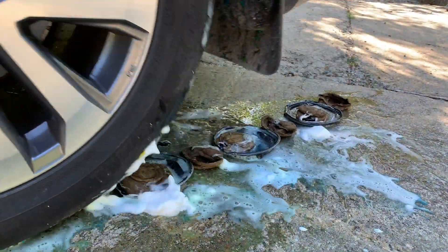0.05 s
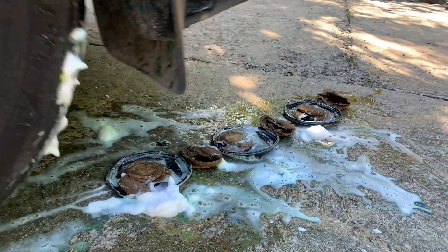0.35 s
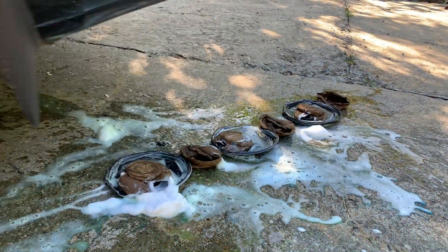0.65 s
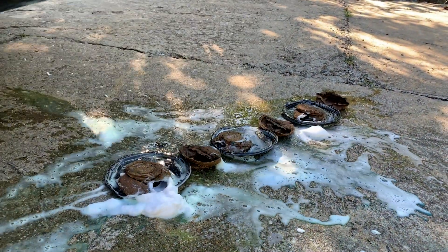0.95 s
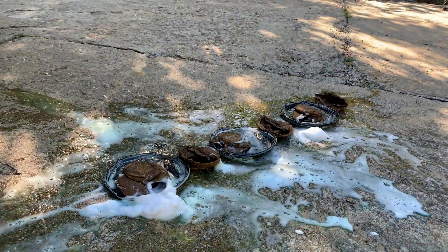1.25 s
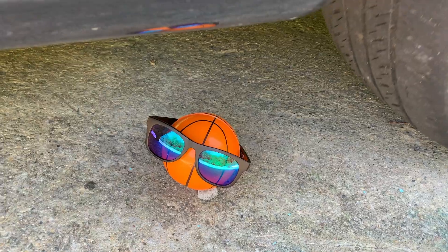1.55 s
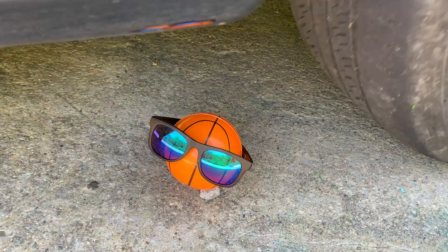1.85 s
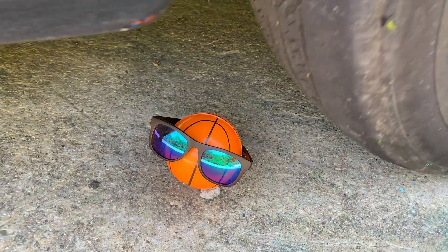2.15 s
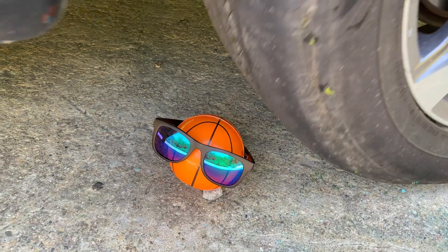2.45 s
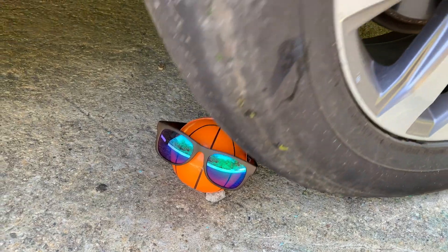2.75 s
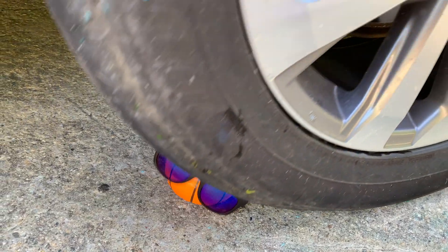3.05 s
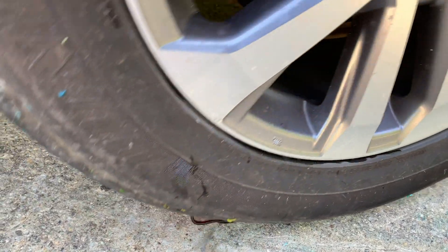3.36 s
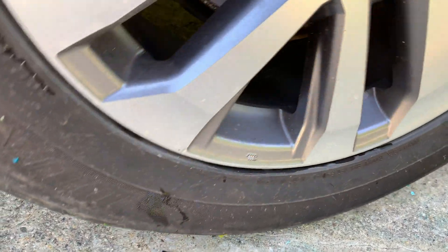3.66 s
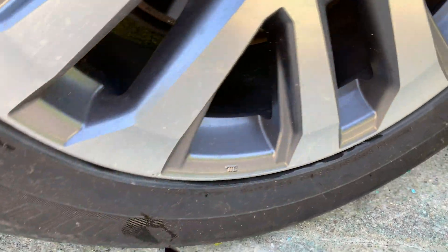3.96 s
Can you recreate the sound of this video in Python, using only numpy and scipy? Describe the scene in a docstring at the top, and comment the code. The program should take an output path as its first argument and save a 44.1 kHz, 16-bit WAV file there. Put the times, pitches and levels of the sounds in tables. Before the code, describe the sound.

Plastic sunglasses and a toy ball crack under a car tyre. The engine first idles quietly, heard close to the ground, then come faint creaks and three loud cracks with ticking splinters near the end.

```python
"""Plastic sunglasses and a toy ball break under a car's tyre: faint cracks, then three loud cracks. Each
fracture releases stored strain as a pop and a burst of noise and sets the frame and tyre ringing; splinters
tick away. The four-cylinder engine idles as the car creeps over concrete, its periodic firing heard as drone
and clatter close to the ground, first by the exhaust, then by the front wheel. The loudest cracks overload the
microphone."""
import sys
import numpy as np
from scipy import signal
from scipy.fft import rfft, irfft
from scipy.io import wavfile
from scipy.ndimage import uniform_filter1d

SR = 44100
rng = np.random.default_rng(int(sys.argv[2]) if len(sys.argv) > 2 else 0)


def to_wav(s):
    """Save 16-bit WAV."""
    ch = np.atleast_2d(s).T  # columns
    pcm = np.round(np.clip(ch, -1, 1) * 32767)  # PCM
    wavfile.write(sys.argv[1], SR, pcm.astype(np.int16))


N = 176400

# Fractures. Each row: start in seconds, pitch in Hz, levels of pop, frame, body, snap and fizz in dB,
# base decay time in seconds, tyre level in dB.
CRACKS = [(3.0752, 400, -38, -47, -38, -30.5, -48, 0.015, -70),
          (3.1037, 887, -58, -63, -51, -44, -59, 0.039, -75),
          (3.3152, 1930, -33, -46, -48, -34, -58, 0.0097, -77),
          (3.3341, 2290, -44, -54, -53, -37, -32.5, 0.023, -77),
          (3.34, 1580, -42, -50, -48, -34.5, -44, 0.0089, -77),
          (3.4320, 683, 0, -15.5, -15.5, -21, -12.5, 0.028, -27.5),
          (3.6720, 1003, -9, -20.5, -20, -15.5, -21.5, 0.026, -30.5),
          (3.6774, 1650, -20, -27, -35, -38, -18.5, 0.023, -65),
          (3.7860, 1400, -19, -26.5, -27.5, -26, -62, 0.03, -55),
          (3.8309, 2780, -24.5, -51, -44, -32.5, -58, 0.01, -62),
          (3.868, 1210, -19.5, -40, -31, -26.5, -41, 0.012, -49),
          (3.8742, 368, -4, -16.5, -18.5, -29.5, -38, 0.031, -27.5),
          (3.8758, 1240, -0.5, -20, -27.5, -19.5, -24, .017, -50),
          (3.9350, 1160, -13, -33.5, -27.5, -28.5, -52, 0.01, -40)]
# Normal modes. Each row: frequency in Hz, relative level in dB, time to decay by 60 dB in seconds.
FRAME_MODES = [(342, -5.5, 0.043), (417, 0.5, 0.033), (460, 0.5, 0.052), (600, 5.5, 0.023),
               (686, 2.5, 0.038), (845, -3, 0.058), (1010, 2, 0.02), (1153, -1, 0.028), (1236, -12, 0.035),
               (1580, -0.5, 0.031), (2020, -4.5, 0.038), (2196, -2, 0.034), (2540, -6, .04)]
TYRE_MODES = [(78, 3, 0.31), (183.5, -2, 0.66), (125, -7.5, 0.5), (155, 0.5, 0.13), (213.5, -1.5, 0.16),
              (293, -5, 0.17), (536, -19.5, 1), (711, -13, 0.59), (767, -15.5, 0.87), (824, -17.5, .7),
              (890, -20, 0.52)]
# Low, middle and high fracture noise. Each row: frequency in Hz, relative spectral level in dB.
BODY_SPECTRUM = [(60, -22), (170, -13), (260, 4), (380, 9.5), (750, 7), (1150, 2), (1500, -14), (4000, -50)]
SNAP_SPECTRUM = [(500, 3), (1100, -8.5), (1380, -5), (1620, 7.5), (1850, -4), (2200, 3.5), (2700, -5),
                 (3300, -7.5), (4500, -8.5), (7000, -30), (14000, -56)]
FIZZ_SPECTRUM = [(1500, 9), (3500, 0.5), (6000, -1), (7800, 1), (9000, -4), (10700, 1.5), (12200, -9.5),
                 (14500, -5), (16000, -14)]
# Splinters. Each row: start in seconds, pitch in Hz, ring in dB, decay time in seconds, click in dB.
SPLINTERS = [(1.094, 6800, -66, .02, -60), (1.266, 4700, -55, .025, -64), (2.848, 5000, -52.5, 0.027, -65),
             (2.891, 6460, -48, 0.012, -56), (3.207, 7500, -63, .015, -54), (3.297, 7800, -60, .015, -52),
             (3.484, 6450, -45, 0.023, -39), (3.4945, 5430, -54, .015, -44), (3.5752, 4600, -52, .015, -43),
             (3.5888, 6430, -42, 0.015, -44), (3.648, 7000, -60, .015, -51), (3.7200, 6560, -39, .025, -38),
             (3.7277, 6400, -39, .025, -41), (3.7360, 6500, -54, 0.024, -47),
             (3.756, 4600, -18.5, 0.021, -30.5), (3.8120, 7540, -63, .015, -58),
             (3.8260, 6500, -49, .025, -55), (3.862, 6570, -33.5, 0.026, -40),
             (3.8950, 6300, -50, .015, -52), (3.9078, 6550, -51, .025, -54),
             (3.9215, 6550, -57, 0.023, -62), (3.956, 6550, -48, .025, -53), (3.9650, 6500, -52, .02, -46),
             (3.9864, 4580, -15.5, 0.0047, -34.5), (3.989, 5760, -24, .032, -34)]
# Modes of a splinter. Each row: ratio to its pitch, relative level in dB.
SPLINTER_MODES = [(1, -7), (1.25, -20), (1.39, -22), (1.69, -12), (1.92, -26)]
# Harmonics of the cycle: those of the exhaust pulses, and at three times the cycle rate a line from a rotating
# shaft. Each row: multiple of the cycle rate, level in dB at the rear and at the front.
HARMONICS = [(1, -51.5, -62), (2, -62, -67), (3, -62, -74), (4, -49, -52), (5, -79, -108), (6, -64, -82),
             (7, -75, -86), (8, -52, -59), (9, -77, -74), (10, -75, -85), (11, -78, -87), (12, -55, -66.5),
             (13, -67.5, -71), (14, -70.5, -77), (16, -83, -67), (20, -69.5, -94)]
# Engine noises. Each row: frequency in Hz, relative spectral level in dB.
REAR_SPECTRUM = [(130, -22), (200, -20), (260, -11), (550, -10), (700, -10), (900, -15), (1510, -18),
                 (1800, -17.5), (2000, -24.5), (3060, -27), (3630, -32.5), (7000, -42.5), (10500, -49),
                 (16000, -55)]
FRONT_SPECTRUM = [(100, -39), (170, -15), (312, -2.5), (350, -6), (681, -4), (1430, -12.5), (1730, -11),
                  (2050, -18.5), (3180, -20.5), (4070, -31), (4920, -27.5), (8380, -42.5), (13700, -45.5),
                  (16000, -47)]
RUMBLE_SPECTRUM = [(10, -5), (20, 2.5), (50, 0.5), (90, 0.5), (160, -6), (260, -20.5), (600, -74)]
HISS_SPECTRUM = [(11500, -16), (12400, -13), (12750, -1), (13100, -10), (13550, 2), (13950, -7),
                 (14350, -1), (14900, -7), (15800, -7)]
# Resonances of engine parts. Each row: frequency in Hz, nominal width in Hz, relative level in dB.
REAR_RINGS = [(672, 92, -8), (806, 110, -11), (1797, 88, -12), (3080, 180, -23)]
FRONT_RINGS = [(680, 77, -5), (1220, 29, -13.5), (1782.5, 42, -8), (1670, 62, -12), (2930, 116, -19.5),
               (3237, 75, -23.5), (4880, 150, -31), (7000, 600, -33.5)]
# Envelopes of the clatter, its resonances and the whine. Each row: time in seconds, gain in dB.
REAR_LEVEL = [(0, -49), (.2, -49.5), (.5, -50.5), (.8, -51.5), (1.1, -52), (1.45, -53)]
FRONT_LEVEL = [(1.45, -48.5), (1.85, -47.5), (2.3, -47.5), (2.7, -48.5), (3.1, -49), (3.4, -49), (4, -48.5)]
RING_LEVEL = [(0, -1), (.7, 1.5), (1.1, -2), (1.5, -0.5), (2.7, 0.5), (3.2, -4), (4, -1)]
WHINE_LEVEL = [(0, -48), (.22, -52), (.3, -53.5), (.5, -52), (.7, -62.5), (1.1, -62), (1.4, -58)]
# Churning, which recedes as the wheel nears. Each row: time in seconds, gain on its depth in dB.
SWELL_DEPTH = [(0, 0), (2.5, 0.5), (2.9, 0), (3.3, 0), (4, -2)]
# Knock strengths. Each entry: relative level of one cylinder in dB.
CYLINDER_DB = [-0.59, -1.8, 1, -1.7]

CYCLE_HZ = 11.68  # four firings a cycle
MOVE_S = 1.455  # the listener changes from exhaust (rear) to wheel (front)
STRONG_FIRING_S, KNOCK_AT_S, SWELL_AT_S = 0.68, 1.817, 2  # time origins of the periodic patterns


def cracks(spread_octaves=1.13):
    """Brittle fracture: sudden release of strain radiates a pop and noise and excites frame and tyre."""
    body, snap, fizz = noise(BODY_SPECTRUM), noise(SNAP_SPECTRUM), noise(FIZZ_SPECTRUM)
    out = np.zeros(N)
    for start, hz, pop_db, frame_db, body_db, snap_db, fizz_db, t60, tyre_db in CRACKS:
        first = int(start * SR)
        t = age(start)[first:]
        hit = -undb(pop_db) * ring(t, hz, 0.42 * t60)
        for k, (mode_hz, db, mode_t60) in enumerate(FRAME_MODES):
            coupling = np.exp(-.5 * (np.log2(mode_hz / hz) / spread_octaves) ** 2)
            hit += (-1) ** k * coupling * undb(frame_db + db) * ring(t, mode_hz, mode_t60)
        hit += undb(body_db) * body[first:] * burst(t, 1.46 * t60, tail_db=-8.5, tail_t60=0.13)
        hit += undb(snap_db) * snap[first:] * burst(t, 0.76 * t60, tail_db=-16, tail_t60=4.8 * t60)
        hit += undb(fizz_db) * fizz[first:] * burst(t, 0.54 * t60, tail_db=-20, tail_t60=2.56 * t60)
        tyre = sum(undb(db) * ring(t, mode_hz, mode_t60) for mode_hz, db, mode_t60 in TYRE_MODES)
        out[first:] += hit + undb(tyre_db) * tyre
    return out


def splinters():
    """Free vibration: small stiff pieces click off and rattle, their highest modes damped fastest."""
    fizz, out = noise(FIZZ_SPECTRUM), np.zeros(N)
    rattles = [1 + .8 * walk(700) for _ in SPLINTER_MODES]
    for start, hz, ring_db, t60, click_db in SPLINTERS:
        first = int(start * SR)
        t = age(start)[first:]
        modes = 0
        for (ratio, db), rattle in zip(SPLINTER_MODES, rattles):
            mode_t60 = t60 * min(1, 7000 / (hz * ratio)) ** 1.5
            modes += undb(db) * ring(t, hz * ratio, mode_t60) * rattle[first:]
        click = fizz[first:] * burst(t, 0.0046, tail_db=-15.5, tail_t60=0.061)
        out[first:] += undb(ring_db) * modes + undb(click_db) * click
    return out


def engine():
    """An extended source sounds different from place to place: first the rear, then the front."""
    front = np.clip(age(MOVE_S) / 0.0081, 0, 1)
    by_exhaust = curve(REAR_LEVEL) * clatter(
        REAR_SPECTRUM, REAR_RINGS, noise_db=-1.18, hiss_db=-30, knock=.5, swell_db=-1.3, ring_swell_db=-2)
    by_wheel = curve(FRONT_LEVEL) * clatter(
        FRONT_SPECTRUM, FRONT_RINGS,
        noise_db=-1.5, hiss_db=-31.5, knock=.8, swell_db=3.5, ring_swell_db=12.5)
    by_exhaust += whine()
    return drone(front) + (1 - front) * by_exhaust + front * by_wheel


def drone(front, rear_rumble_db=-54.5, front_rumble_db=-58):
    """Periodic exhaust pulses, one stronger than the rest, give harmonics of the cycle over a rumble; a
    rotating shaft adds the line at three times the cycle rate."""
    cycles = np.cumsum(CYCLE_HZ * (1 + .002 * walk(2.93))) / SR - CYCLE_HZ * STRONG_FIRING_S
    out = noise(RUMBLE_SPECTRUM) * undb(rear_rumble_db + front * (front_rumble_db - rear_rumble_db))
    for k, rear_db, front_db in HARMONICS:
        wobble = 1 + 0.12 * walk(7.52)
        amplitude = np.sqrt(2) * undb(rear_db + front * (front_db - rear_db)) * wobble
        out += amplitude * np.sin(2 * np.pi * k * cycles)
    return out


def clatter(spectrum, rings, noise_db, hiss_db, knock, swell_db, ring_swell_db):
    """Forced vibration: firings knock the engine's parts, churning every second cycle over a thin hiss."""
    t = np.arange(N) / SR
    firings = 4 * CYCLE_HZ * (t - KNOCK_AT_S)
    strengths = undb(np.tile(CYLINDER_DB, 64) + 1.5 * rng.standard_normal(256))
    strength = strengths[np.floor(firings).astype(int) % 256]
    knocks = 1 + knock * strength * np.exp(-(firings % 1) / 0.33)  # decays in a third of a firing
    swell = np.exp(3.6 * (np.cos(np.pi * CYCLE_HZ * (t - SWELL_AT_S)) - 1)) * curve(SWELL_DEPTH)
    out = undb(noise_db) * unit(noise(spectrum) * knocks * undb(swell_db * swell))
    out += undb(hiss_db) * noise(HISS_SPECTRUM)
    for hz, width, db in rings:
        depth_db = ring_swell_db * min(1, 2400 / hz)  # the highest rings stay steadier
        force = rng.standard_normal(N) * knocks ** 2 * undb(depth_db * swell)
        out += undb(db) * curve(RING_LEVEL) * resonate(force, hz, 1.35 * width)
    return out


def whine():
    """A narrow resonance driven by noise gives a pitch, which fades as the car draws away."""
    return resonate(rng.standard_normal(N), hz=644, width_hz=23) * curve(WHINE_LEVEL)


def burst(t, t60, tail_db, tail_t60):
    """A fracture and its echo between ground and underbody add in power to form one envelope."""
    return np.hypot(fade(t, t60), undb(tail_db) * fade(t, tail_t60))


def ring(t, hz, t60):
    """A struck mode vibrates as a damped sinusoid."""
    return np.sin(2 * np.pi * hz * t) * fade(t, t60)


def fade(t, t60):
    """Exponential decay from t = 0, by 60 dB in t60 seconds."""
    return (t > 0) * np.exp(-np.minimum(np.log(1000) * t / t60, 40))


def resonate(x, hz, width_hz):
    """Two equal resonators in series pass a narrow band, scaled to rms 1."""
    b, a = signal.iirpeak(hz, hz / width_hz, fs=SR)
    return unit(signal.lfilter(b, a, signal.lfilter(b, a, x)))


def noise(spectrum):
    """Filtered white noise of rms 1, falling 24 dB an octave below the spectrum's first point."""
    hz, db = np.array(spectrum, float).T
    octave = np.log2(np.maximum(np.arange(N // 2 + 1) * SR / N, 1))
    gain_db = np.interp(octave, np.log2(hz), db) - 24 * np.maximum(np.log2(hz[0]) - octave, 0)
    return unit(irfft(rfft(rng.standard_normal(N)) * undb(gain_db), N))


def walk(rate_hz):
    """Smoothed random steps give a fluctuation of rms 1."""
    hold = int(SR / rate_hz)
    steps = np.repeat(rng.standard_normal(N // hold + 1), hold)
    return unit(uniform_filter1d(uniform_filter1d(steps, hold), hold)[:N])


def curve(rows):
    """Gain over time, linear in dB between points."""
    return undb(np.interp(np.arange(N) / SR, *np.array(rows).T))


def age(start):
    """Seconds since start, zero before it."""
    return np.maximum(np.arange(N) / SR - start, 0)


def undb(db):
    """Decibels to amplitude ratio."""
    return 10 ** (np.asarray(db) / 20)


def unit(x):
    """Normalisation to rms 1."""
    return x / np.sqrt(np.mean(x ** 2))


def scene():
    """Superposition: the pressures of engine and breaking plastic add at one microphone."""
    return (engine() + cracks() + splinters())[None]


def record(dry, ceiling=.5, top_hz=15850):
    """Saturation in the microphone flattens the loudest peaks; a low-pass limits the bandwidth."""
    clipped = dry / (1 + (dry / ceiling) ** 8) ** (1 / 8)
    return signal.sosfilt(signal.ellip(8, .2, 80, top_hz, fs=SR, output="sos"), clipped)


dry = scene()
out = record(dry)
to_wav(out)
```